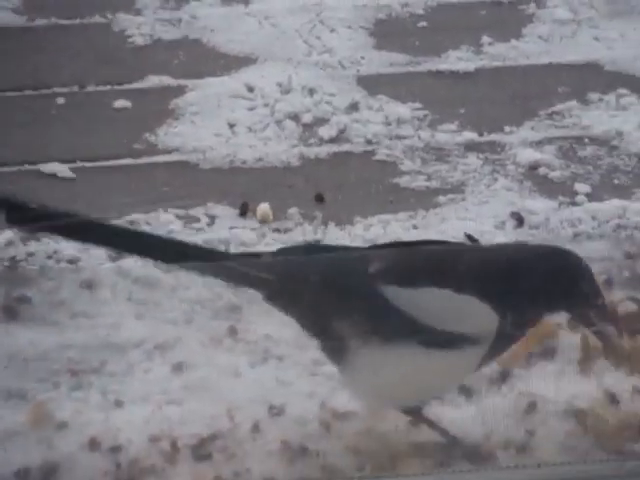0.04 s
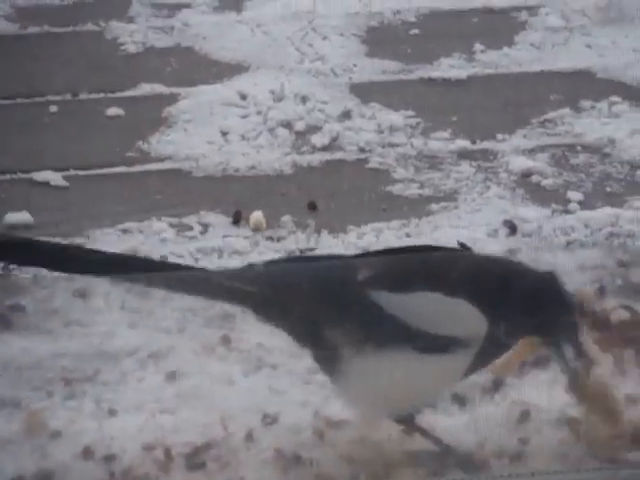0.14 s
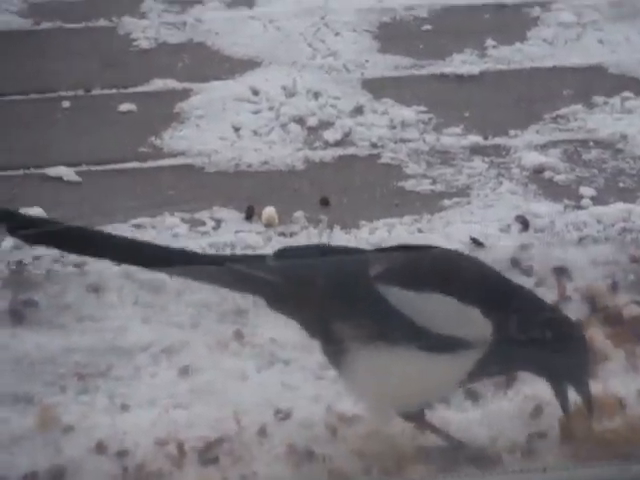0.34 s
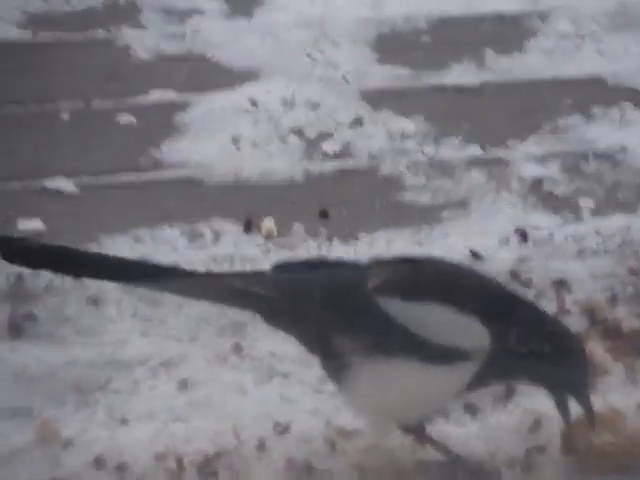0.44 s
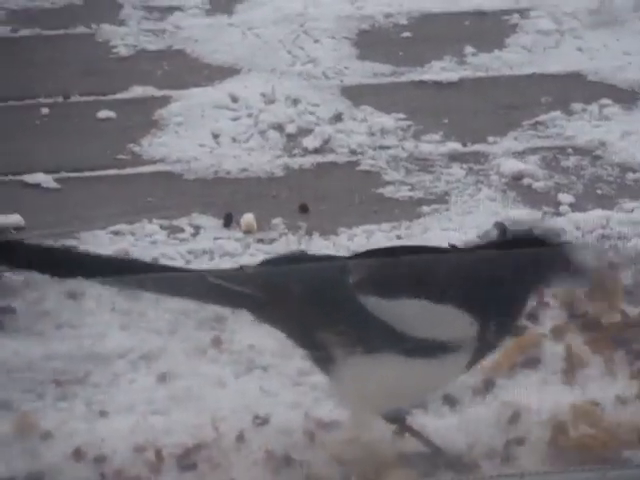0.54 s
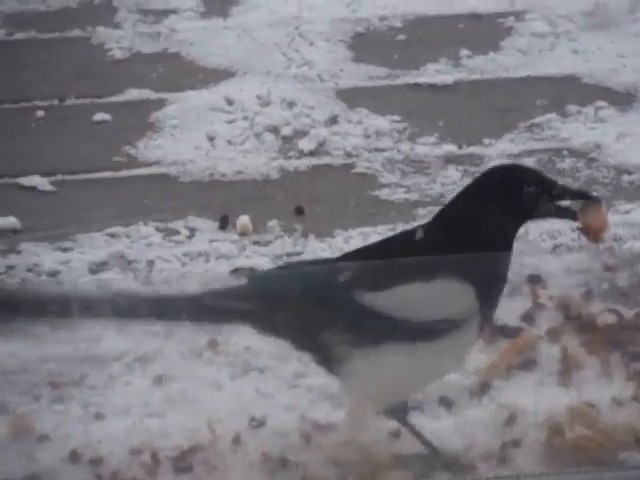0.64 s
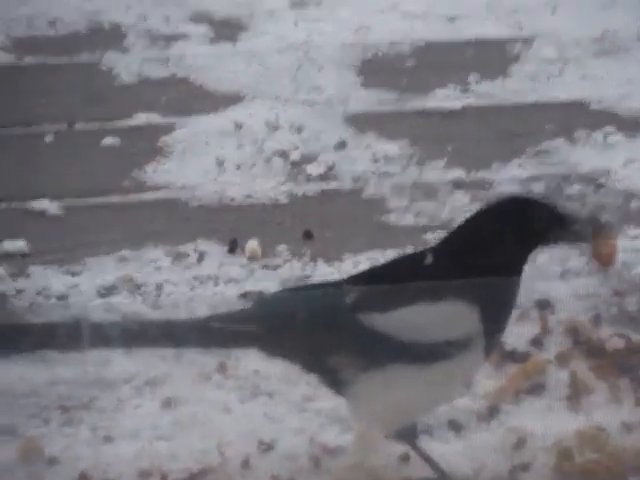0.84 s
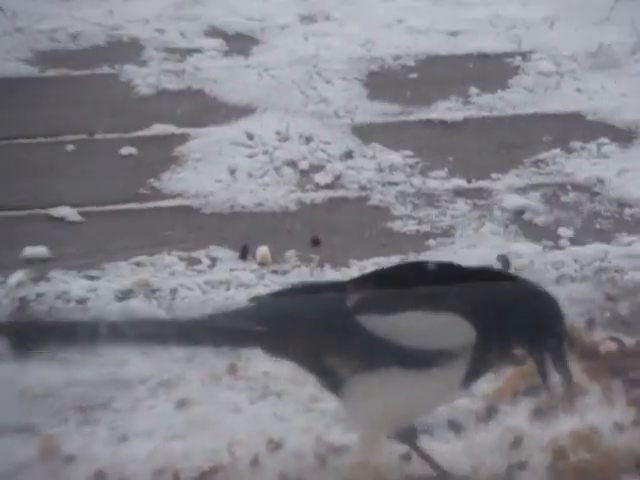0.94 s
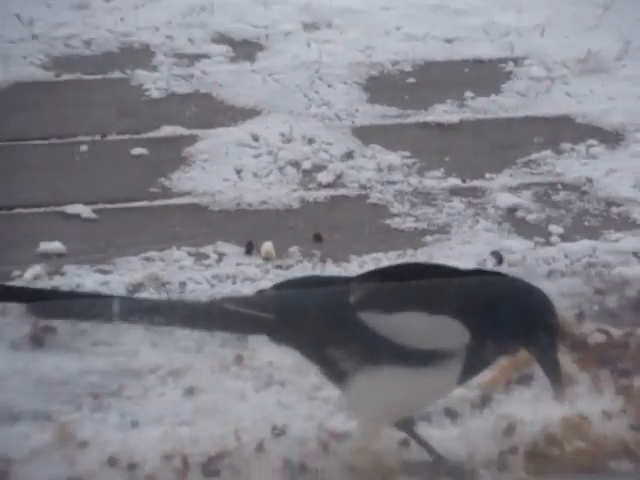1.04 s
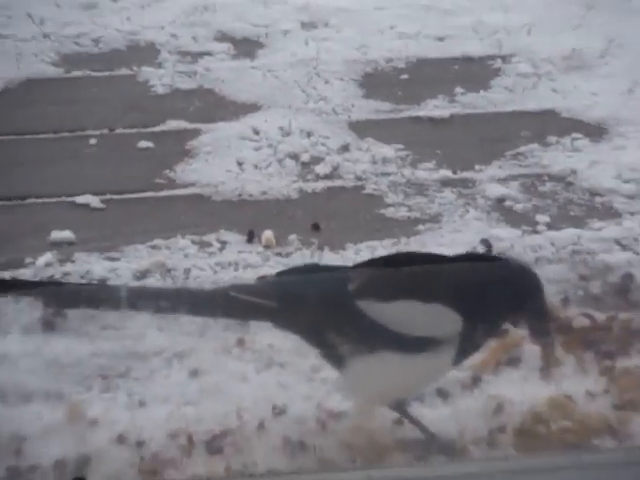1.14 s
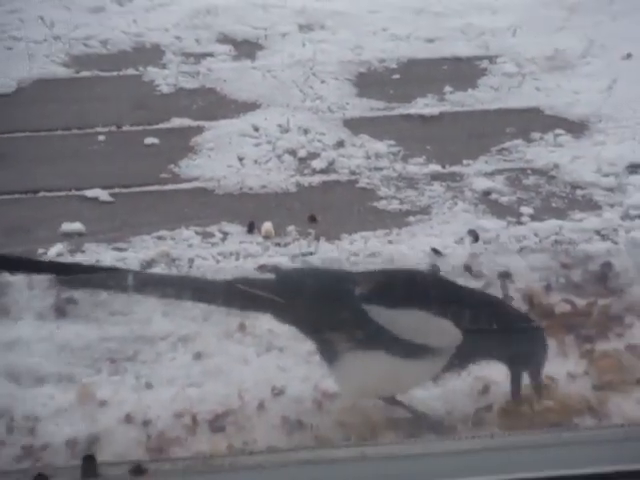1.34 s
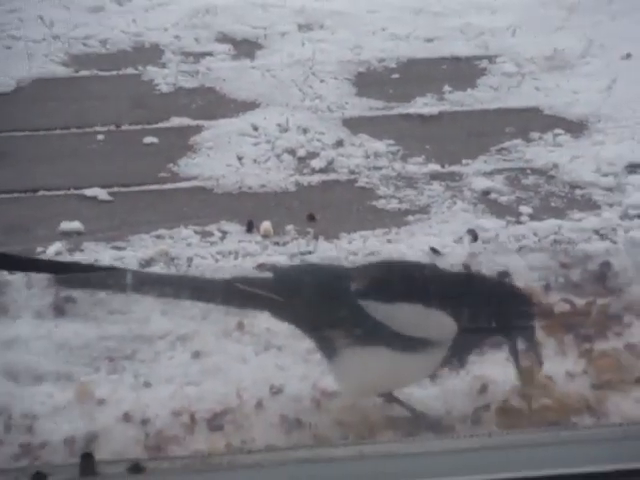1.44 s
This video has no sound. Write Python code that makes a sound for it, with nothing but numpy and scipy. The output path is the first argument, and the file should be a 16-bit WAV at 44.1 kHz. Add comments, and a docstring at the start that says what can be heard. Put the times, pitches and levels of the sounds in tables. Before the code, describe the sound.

Two sharp pecks of a bird's bill, with a click and soft, scratchy rustling.

```python
"""A magpie feeds on a snowy patio, heard from indoors over a quiet room and the camera's thin whine.
After a faint rustle its bill snaps shut (0.2 s). A hard peck (0.4 s) excites damped resonances and
overloads the microphone. From 0.8 s the bird pulls at the food, which ticks as it breaks and rustles
as it scrapes, while a faint whirr like a lens motor runs for about half a second. A second, duller
peck lands (1.1 s), and the last ticks and rustles follow."""
import sys
import numpy as np
from scipy.fft import rfft, irfft, next_fast_len
from scipy.io import wavfile
from scipy.ndimage import map_coordinates

SR = 44100
rng = np.random.default_rng(int(sys.argv[2]) if len(sys.argv) > 2 else 0)


def log_audio(samples):
    """Write samples as a 16-bit WAV file to the path given in sys.argv[1]."""
    # one column per channel
    frames = np.atleast_2d(samples).T
    # limit to full scale, then quantise
    limited = np.clip(frames, -1, 1)
    pcm = np.round(limited * 32767).astype(np.int16)
    wavfile.write(sys.argv[1], SR, pcm)


N = 66150
T = np.arange(N) / SR
HIT_T = T[:SR // 5]

# Blows of the bill: (time [s], push level [dB], push width [s], ring gain [dB],
# contact resonance [Hz], crunch level [dB], crunch length [s])
PECKS = [(0.407, -3, .00022, -9.5, 5300, 0.5, 0.0021), (1.1382, -6.5, 0.00067, -4, 1500, -12.5, 0.0018)]
# Modes excited by a peck: (frequency [Hz], relative level [dB], t60 [s])
PECK_MODES = [(213, -13.5, 0.0128), (452, -11.5, 0.058), (658, -5, 0.017), (1360, -9.5, .012),
              (1813, -17.5, 0.033), (2216, 1.5, 0.017), (2405, -3, 0.012), (2590, -12, 0.03),
              (2730, -7.5, 0.016), (3100, -7.5, 0.022), (4110, -15.5, 0.044), (4454, 4.5, 0.016),
              (4610, -8, 0.032), (5050, -18.5, 0.065), (5750, -11.5, 0.025), (6900, -12, 0.024),
              (8550, -30, 0.054)]
# Spectrum of a peck's crunch: (frequency [Hz], relative level [dB])
CRUNCH_SPECTRUM = [(100, -4.5), (600, -20), (1400, -7), (2500, 1.5), (5000, -4.5), (7000, -2.5),
                   (8800, -10.5), (11000, -4.5), (13000, -9), (16000, -32)]
# The bill's edges catching in quick succession: (time [s], gain [dB])
SNAP_CONTACTS = [(0.2102, -4.5), (0.2116, -3)]
# Modes of the bill: (frequency [Hz], relative level [dB], t60 [s])
BILL_MODES = [(2830, -6, 0.0037), (3530, -6.5, 0.0047), (4110, -3, 0.0057), (5800, -13.5, 0.0048),
              (6800, -5.5, 0.0047), (7700, -13.5, 0.0033)]
# Fractures in the food: (time [s], level [dB], centre [Hz], width [octaves], length [s])
TICKS = [(0.157, -43.5, 5030, 0.32, .0015), (0.219, -38.5, 5600, 0.39, .001),
         (.2855, -50.5, 4000, 1.3, 0.0017), (0.3917, -44.5, 5500, 1.6, 0.0066),
         (0.8368, -32, 3100, 1.5, 0.0028), (0.8409, -34.5, 4500, 1.4, 0.0011),
         (0.8535, -30.5, 2600, 0.91, 0.0017), (0.863, -35, 5200, 0.21, 0.0015),
         (0.8736, -33.5, 4200, .6, 0.0012), (0.8835, -41, 4400, .6, 0.0025),
         (0.8895, -40, 3980, 2.9, 0.0017), (0.9634, -34, 3140, 0.1, 0.0013),
         (0.9724, -31.5, 3250, 1.75, 0.0038), (1.0232, -36.5, 3270, 0.42, 0.00075),
         (1.0430, -44.5, 4970, .9, 0.0027), (1.1176, -40, 4500, 1.4, 0.008),
         (1.1955, -42, 4500, 1.3, 0.0025), (1.2252, -39, 3220, 1.4, 0.0024),
         (1.2852, -37, 2840, .55, 0.0029), (1.3134, -46, 5000, 0.61, .0015),
         (1.336, -37, 5000, 0.12, 0.001), (1.343, -35.5, 4900, 0.25, 0.001),
         (1.354, -36.5, 3370, 0.76, 0.0052), (1.3605, -37, 3960, 0.9, 0.0014),
         (1.3714, -40.5, 5100, .35, 0.00084), (1.3853, -41.5, 5100, 0.13, 0.0016),
         (1.455, -38.5, 5240, 0.14, 0.0013)]
# Spectrum of the food: (frequency [Hz], relative level [dB])
FOOD_SPECTRUM = [(100, -18), (700, -4), (1300, 3), (2100, -1), (2500, -6.5), (3200, 0), (5200, 0.5),
                 (6800, -4.5), (8500, -20.5), (16000, -35)]
# Pulls at the food: (time [s], length [s], level [dB], centre [Hz], width [octaves])
RUSTLES = [(.01, 0.2, -58, 4330, 0.97), (0.063, 0.055, -50.5, 5860, 0.21),
           (0.079, 0.073, -55.5, 2740, 0.22), (0.85, 0.062, -44, 4300, 0.93),
           (0.877, 0.12, -48.5, 4350, 0.89), (0.983, 0.14, -53, 3950, 1), (1.085, 0.2, -44.5, 4280, 0.52),
           (1.337, 0.039, -52, 4440, 0.97), (1.452, 0.026, -46.5, 5130, 0.097),
           (1.476, 0.066, -54.5, 5030, 0.43)]
# Motor harmonics 1 to 3: (level [dB])
MOTOR_HARMONICS = [-61.5, -53.5, -62]
# Spectrum of the room's air: (frequency [Hz], relative level [dB])
ROOM_SPECTRUM = [(20, -12), (60, 3.5), (100, -4.5), (160, -2.5), (240, -0.5), (330, -6.5), (500, -7.5),
                 (750, -9.5), (1400, -16.5), (2200, -22.5), (5000, -21), (12000, -62)]
# Spectrum of the microphone's hiss: (frequency [Hz], relative level [dB])
HISS_SPECTRUM = [(500, -17), (2000, 3), (4000, 0), (7000, 4), (9000, -1.5), (15400, -1.5), (16000, -30)]
# Envelope of the rumble: (time [s], relative level [dB])
RUMBLE_ENVELOPE = [(0, -58), (.14, -52.5), (.19, -46), (.38, -49.5), (.5, -56), (1.5, -58)]


def pecks(contact_q=1.39, push_t60=0.0049, rise_s=0.0036):
    """Impact excitation: a low push, a ring and a crunch; a softer contact passes less treble."""
    out = np.zeros(N)
    for s, push_db, width, ring_db, contact_hz, crunch_db, length in PECKS:
        lowpass = lambda hz: 1 / np.hypot(1 - (hz / contact_hz) ** 2, hz / contact_hz / contact_q)
        out -= amp(push_db) * fade(T - s, push_t60) / (1 + ((T - s) / width) ** 2) ** 1.64
        add(out, s, amp(ring_db) * ring(PECK_MODES, lowpass) * (1 - fade(HIT_T, rise_s)))
        colour = lambda hz: np.sqrt(lowpass(hz)) * along(CRUNCH_SPECTRUM, hz)
        crunch = fracture(colour, length, t60=0.0028, tail_db=-31, tail_t60=0.054)
        add(out, s, amp(crunch_db) * crunch)
    return out


def bill_snap(grit_db=-26, rise_s=0.0028):
    """Free vibration: the closing bill's high, heavily damped modes give a dry, bright click."""
    out = np.zeros(N)
    for s, db in SNAP_CONTACTS:
        grit = amp(grit_db) * fade(HIT_T, t60=0.0056) * rng.standard_normal(len(HIT_T))
        add(out, s, amp(db) * (ring(BILL_MODES) + grit) * (1 - fade(HIT_T, rise_s)))
    return out


def food_ticks():
    """Brittle fracture: each bit of food that cracks radiates a short band of noise."""
    out = np.zeros(N)
    for s, db, centre_hz, octaves, length in TICKS:
        colour = lambda hz: along(FOOD_SPECTRUM, hz) * band(hz, centre_hz, octaves)
        add(out, s, amp(db) * fracture(colour, length, t60=0.0063, tail_db=-15, tail_t60=0.078))
    return out


def food_rustles(grain_hz=750, grain_db=3):
    """Friction noise: grainy scraping swells and sinks with each pull."""
    out = np.zeros(N)
    for s, length, db, centre_hz, octaves in RUSTLES:
        progress = np.clip((T - s) / length, 0, 1)
        swell = np.sqrt(np.abs(np.sin(np.pi * progress)))
        out += amp(db) * swell * noise(lambda hz: along(FOOD_SPECTRUM, hz) * band(hz, centre_hz, octaves))
    return out * unit(amp(grain_db * wobble(grain_hz)))


def motor(pitch_hz=2224, start_s=0.85, stop_s=1.31, fade_s=0.024):
    """Periodic motion: a small motor sounds a harmonic series with slight phase jitter."""
    running = np.clip(np.minimum(T - start_s, stop_s - T) / fade_s, 0, 1)
    phase = 2 * np.pi * pitch_hz * T + 0.15 * wobble(58)
    return running * sum(amp(db) * np.sin(k * phase) for k, db in enumerate(MOTOR_HARMONICS, 1))


def camera_whine(pitch_hz=7867, level_db=-51.5, pulse_db=2, swing_rad=1.15, frame_hz=30):
    """Modulation: a square wave at the frame rate shifts an electronic tone's level and phase."""
    square = np.tanh(20 * np.sin(2 * np.pi * frame_hz * (T - .021)))
    return amp(level_db + pulse_db * square) * np.sin(2 * np.pi * pitch_hz * T + swing_rad * square)


def room(hum_hz=1120):
    """Noise floor: a drifting rumble, a faint hum, quiet air and microphone hiss add in power."""
    rumble_db = np.interp(T, *np.transpose(RUMBLE_ENVELOPE)) - 3.5
    rumble = amp(rumble_db) * noise(lambda hz: band(hz, centre_hz=32.6, octaves=1.0))
    hum = amp(-64) * np.sin(2 * np.pi * hum_hz * T + .5 * wobble(46))
    air = amp(-53.5) * noise(lambda hz: along(ROOM_SPECTRUM, hz))
    hiss = amp(-57.5) * noise(lambda hz: along(HISS_SPECTRUM, hz))
    return air + hiss + rumble + hum


def ring(modes, gain=lambda hz: 1):
    """Modal superposition: damped sines, neighbours swinging in opposite directions."""
    return sum((-1) ** k * amp(db) * gain(hz) * fade(HIT_T, t60) * np.sin(2 * np.pi * hz * HIT_T)
               for k, (hz, db, t60) in enumerate(modes))


def fracture(gain, length, t60, tail_db, tail_t60):
    """A noise transient that holds, drops fast and leaves a weak tail."""
    tail = amp(tail_db) * fade(HIT_T, tail_t60)
    attack = 1 - fade(HIT_T, 0.00085)
    envelope = (fade(HIT_T - length, t60) + tail) * attack
    return unit(envelope * noise(gain, size=len(HIT_T))) * np.sqrt(np.mean(envelope ** 2))


def amp(db):
    """Decibels to amplitude ratio."""
    return 10 ** (np.asarray(db) / 20)


def unit(x):
    """Normalisation to rms 1."""
    return x / np.sqrt(np.mean(x ** 2) + 1e-20)


def fade(t, t60):
    """Full until t = 0, then exponential decay."""
    return np.exp(-np.log(1000) * np.maximum(t, 0) / t60)


def along(points, hz):
    """Gain interpolated on a log-frequency axis."""
    f, db = np.transpose(points)
    return amp(np.interp(np.log(hz + 1), np.log(f + 1), db))


def band(hz, centre_hz, octaves):
    """A Gaussian passband in log frequency."""
    return np.exp(-.5 * (np.log2((hz + 1) / centre_hz) / octaves) ** 2)


def filtered(x, gain):
    """Linear filtering: the spectrum of x times gain(hz)."""
    m = next_fast_len(len(x) + SR // 10)
    return irfft(rfft(x, m) * gain(np.fft.rfftfreq(m, 1 / SR)), m)[:len(x)]


def noise(gain, size=N):
    """Coloured noise of rms 1."""
    return unit(filtered(rng.standard_normal(size), gain))


def wobble(rate):
    """A smooth random curve, rate knots a second."""
    return map_coordinates(rng.standard_normal(N), [T * rate], order=3)


def add(track, s, sound):
    """Superpose a sound on the track at time s."""
    part = track[max(round(s * SR), 0):][:len(sound)]
    part += sound[:len(part)]


def scene():
    """Superposition: the bird, the room and the camera sum in one channel."""
    bird = pecks() + bill_snap() + food_ticks() + food_rustles()
    return (bird + room() + camera_whine() + motor())[None]


def record(dry, ceiling=0.81, knee=4.3, top_hz=16600):
    """Saturation: the input clips softly on the hard pecks, then a low-pass limits the band."""
    clipped = dry[0] / (1 + np.abs(dry[0] / ceiling) ** knee) ** (1 / knee)
    return filtered(clipped, lambda hz: np.clip((top_hz - hz) / 500 + .5, 0, 1))[None]


dry = scene()
out = record(dry)
log_audio(out)
```